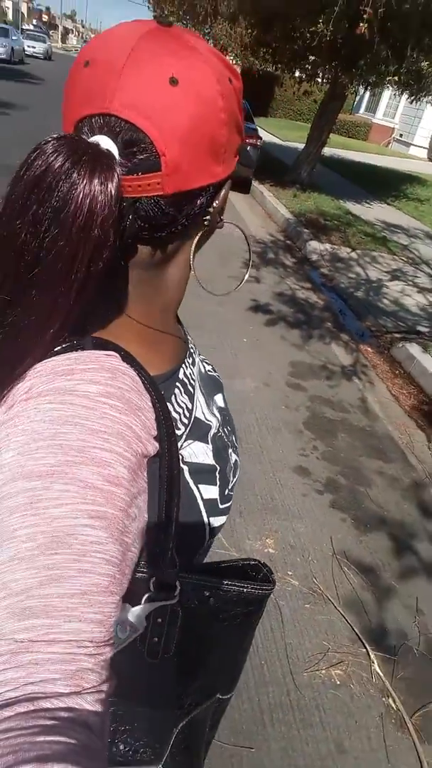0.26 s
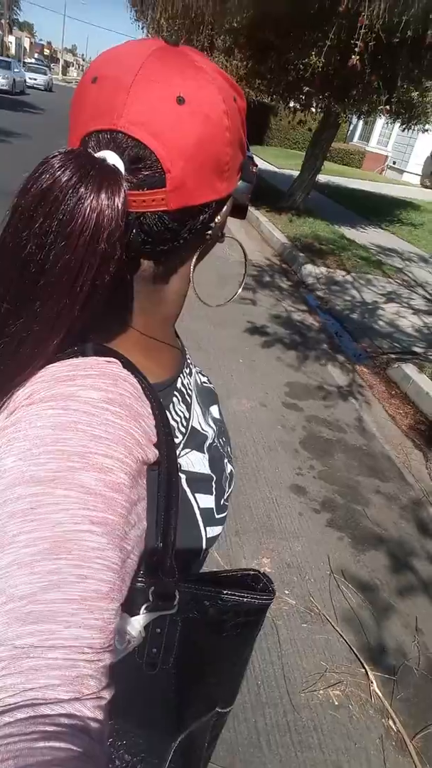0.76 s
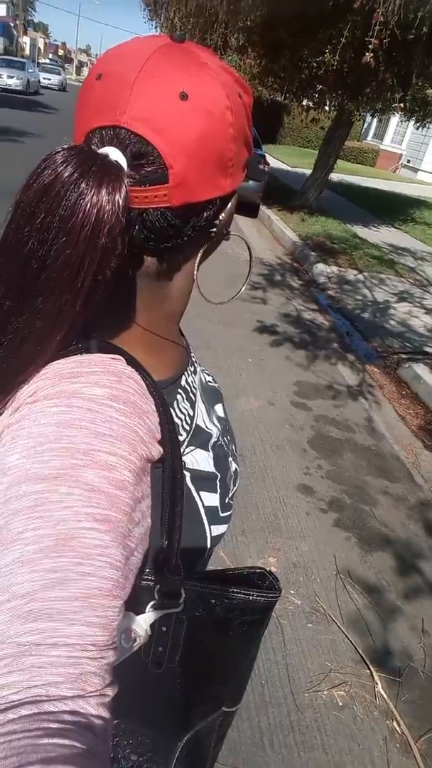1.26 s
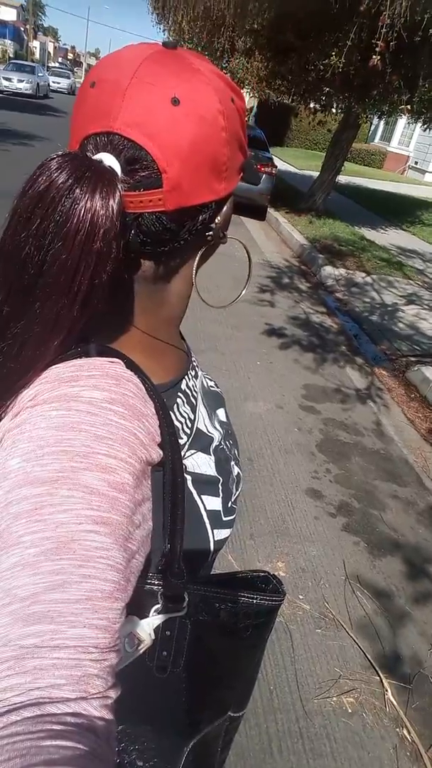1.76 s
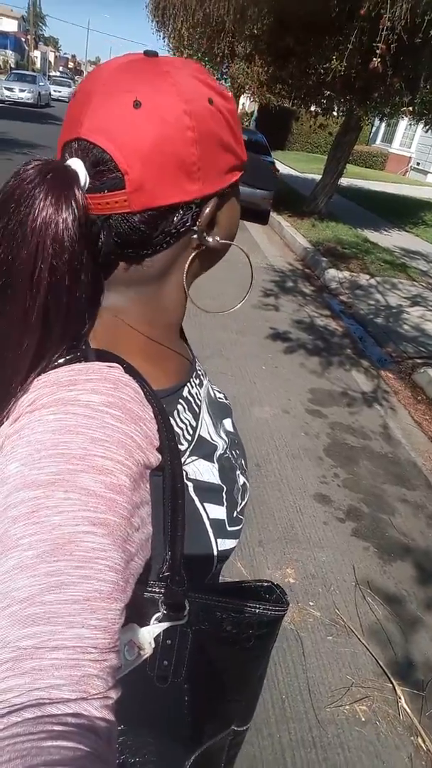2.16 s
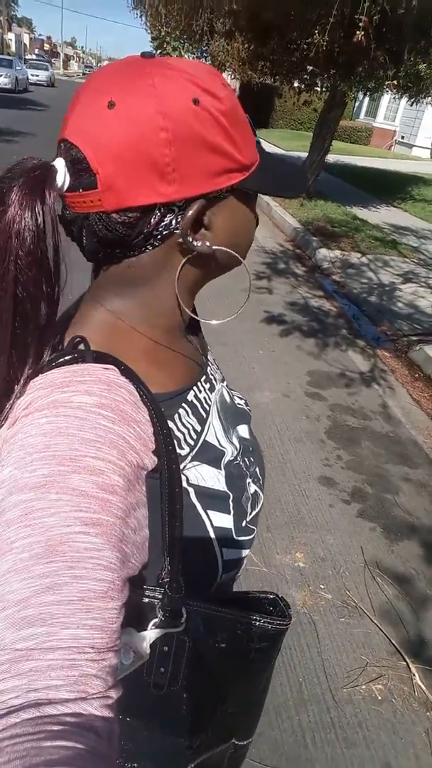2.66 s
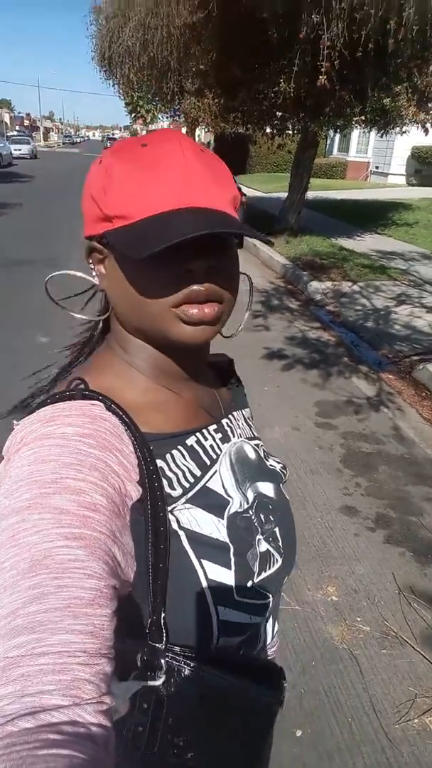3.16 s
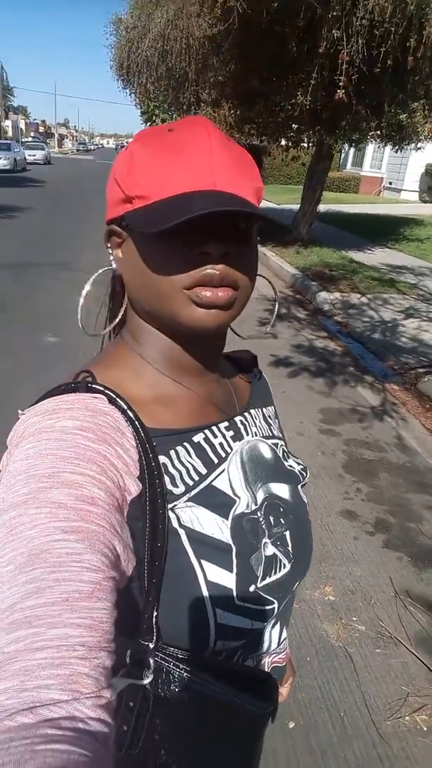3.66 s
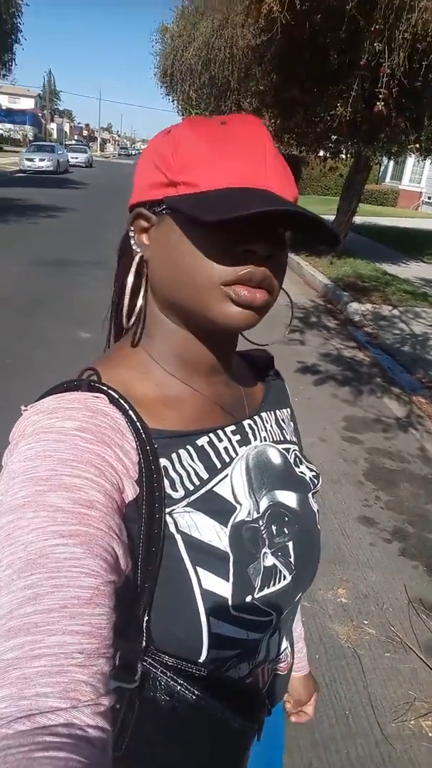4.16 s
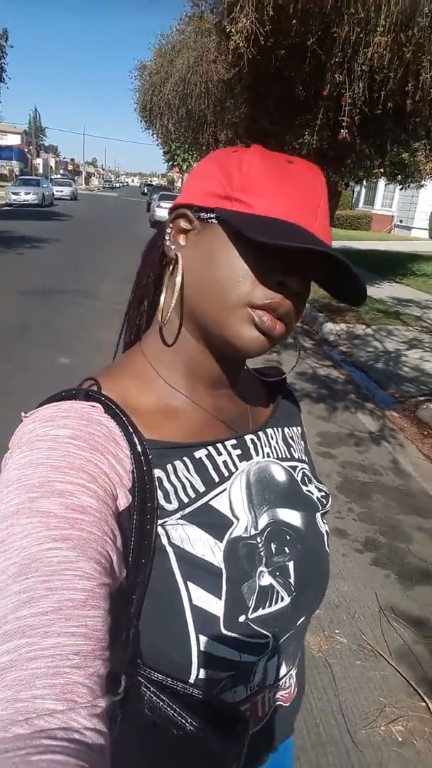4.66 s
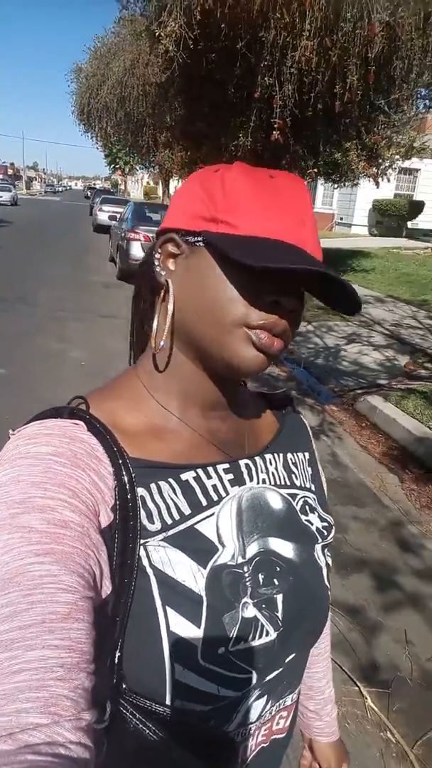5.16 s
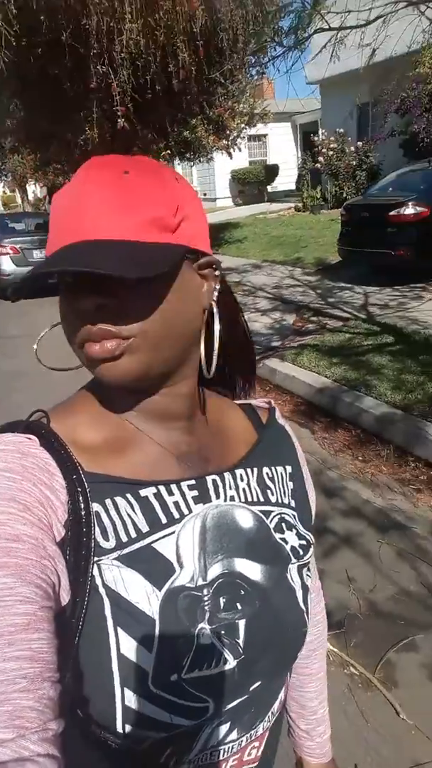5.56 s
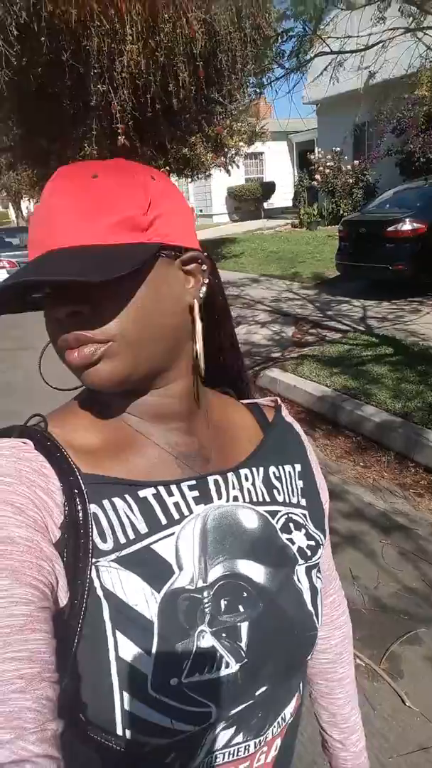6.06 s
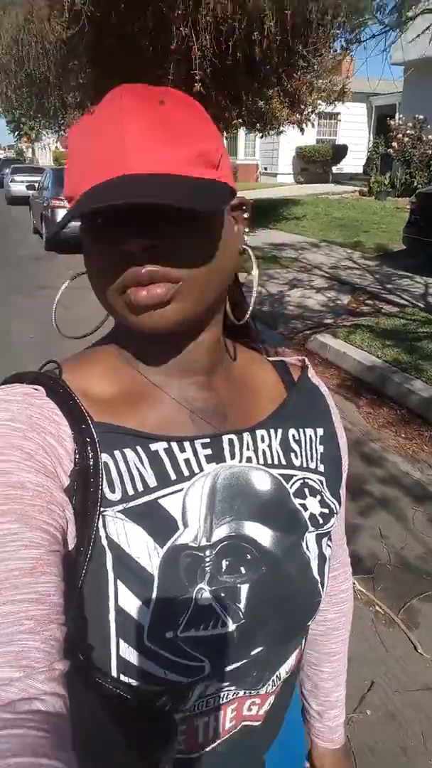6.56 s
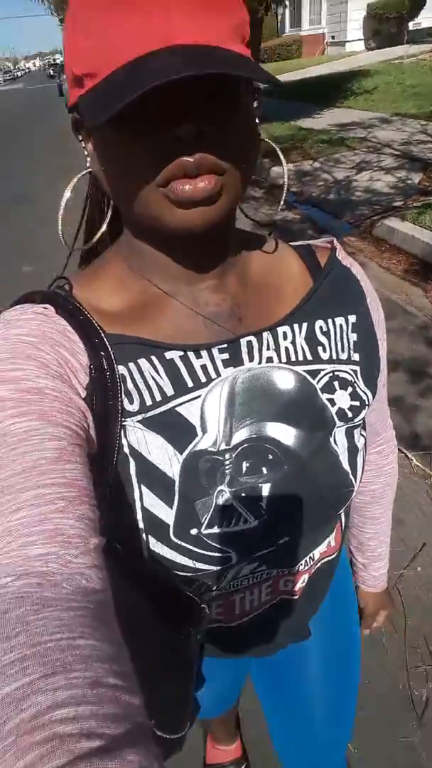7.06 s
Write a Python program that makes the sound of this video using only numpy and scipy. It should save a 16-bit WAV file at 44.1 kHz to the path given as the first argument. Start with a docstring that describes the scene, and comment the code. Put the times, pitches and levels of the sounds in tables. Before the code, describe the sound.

Sparrows chirp over distant traffic and an idling engine on a quiet street; a car door slams, and clothes rustle close by.

```python
"""Quiet residential street, phone at arm's length.

Sparrows chirp in the trees and a farther songbird whistles, over an idling engine, distant traffic
and faint sirens. A car door slams, ringing its skin and cabin, and the houses answer. Close to the
microphone come gritty scuffs from soles and a hand shifting its grip on the phone; clothes and a
shoulder bag rub as the holder turns, and the bag's fittings tick sharply near the end."""
import sys
import numpy as np
from scipy import signal
from scipy.fft import rfft, irfft, next_fast_len
from scipy.io import wavfile
from scipy.ndimage import uniform_filter1d, map_coordinates

SR = 44100
rng = np.random.default_rng(int(sys.argv[2]) if len(sys.argv) > 2 else 0)


def unload_audio(sound):
    """Save the sound as a 16-bit wav file, at the path given as the first command line argument."""
    columns = np.transpose(np.atleast_2d(sound))
    # keep every value between -1 and 1, then stretch to whole-number steps
    steps = np.round(np.clip(columns, -1, 1) * 32767)
    wavfile.write(sys.argv[1], SR, steps.astype(np.int16))


N = 322812

# Diffuse sound at the two ports. Each row: frequency in Hz, left-right likeness (1 is identical).
PORT_LIKENESS = [(200, 0.96), (1200, 0.68), (4000, 0.041)]
# Echo between the houses. Each row: frequency in Hz, t60 in seconds.
STREET_DECAY = [(100, 0.74), (1000, 0.53), (4000, 0.42), (7000, 0.51), (14000, 0.062)]

# Distant roads. Each row of a spectrum, here and below: frequency in Hz, relative density in dB.
RUMBLE_SPECTRUM = [(20, -39), (40, -23), (60, -7), (190, 0.5), (260, -6), (340, -14.5), (900, -45),
                   (2000, -75)]
DRONE_SPECTRUM = [(150, -40), (260, -4.5), (350, 0), (480, -6.5), (900, -45.5)]
TYRE_SPECTRUM = [(150, -7.5), (500, 1.5), (900, -3.5), (1500, -9.5), (2200, -16), (4500, -20), (6000, -34),
                 (15500, -36.5)]
# Far vehicles. Each row: time when nearest and half length in seconds, rumble and drone in relative dB.
PASSES = [(1.102, 0.43, -51, -61), (3.097, 0.35, -53, -64.5), (5.113, 0.45, -50, -57),
          (5.86, 0.12, -66, -49.5), (6.777, 0.38, -54.5, -56.5)]
# The parked engine. Each row: time in seconds, firing rate in Hz, relative level in dB.
ENGINE_IDLE = [(0, 128.1, -45), (3.5, 126.5, -44.5), (5.3, 124.9, -49), (7.3, 123.7, -55)]

# A far siren carries through gaps between the houses.
# Each row: peak time, rise and fall in seconds, relative level in dB.
WAIL_SWELLS = [(.88, 0.22, 0.09, -68.5), (1.62, 1.3, 0.54, -71.5), (4.75, 1, 0.58, -75),
               (6.6, 1.26, 1.9, -77)]
# Snatches of a lower siren.
# Each row: middle and half length in seconds, pitch in Hz, glide in Hz a second, relative level in dB.
LOW_SIREN_GLIDES = [(.3, 0.64, 820.3, 76.5, -63), (5.2, 0.46, 899, -170, -70.5)]

# The songbird. Each row: middle in seconds, pitch in Hz, glide in Hz a second, relative level in dB.
SONGBIRD_WHISTLES = [(.07, 3510, -8000, -67), (.392, 3220, -17000, -62), (.52, 2970, -11000, -67),
                     (.885, 3000, -12000, -64), (.97, 2760, -9000, -74), (1.15, 5000, -500, -73),
                     (2.376, 3590, 12001, -68), (2.449, 2850, 10999.5, -69), (2.49, 4200, -8000, -63),
                     (3.16, 4150, 4999, -67.5)]
# Sparrow syllables, one arch of pitch each. Each row: start, crest and end in seconds into the call,
# half width in seconds, foot and top in Hz, flatness of the top, relative level in dB.
CHIRRUP_SHAPE = [(.002, .034, 0.066, .017, 2557, 4485, 5.08, 1.5),
                 (.050, .078, 0.11, .02, 2716, 4222, 2.57, 2)]
CHEEUP_SHAPE = [(.004, .037, 0.09, .0172, 3045, 4692, 4.6, 1),
                (.086, .107, 0.13, 0.0065, 2520, 3764, 1.73, 3.45)]
CHIP_SHAPE = [(-0.0035, 0.018, 0.062, 0.017, 3200, 3800, 1.67, 1)]
# Calls from the trees. Each row: start in seconds, pitch shift in Hz, relative level in dB.
CHIRRUP_CALLS = [(0.132, 86.5, -45.5), (1.276, -32.5, -45), (2.538, 21, -44.5), (3.928, 20.5, -44),
                 (5.049, -72, -47), (6.946, 30.5, -46.5)]
CHEEUP_CALLS = [(0.669, 88, -48.5), (1.917, -23, -47.5), (3.187, -25.5, -49), (4.44, -39.5, -48),
                (5.626, -61, -46), (6.215, 27.5, -45.5)]
CHIP_CALLS = [(4.801, 171, -53), (5.296, 132, -51), (5.497, 131, -50), (5.853, -18, -49),
              (5.999, -42, -46.5), (6.172, -17, -46), (6.892, -59, -52.5)]
# The sparrows' bearing as the phone swings round. Each row: time in seconds, left port's lead in ms.
SPARROW_BEARING = [(2.6, -.1), (3.3, -0.015), (3.95, -0.077), (5.1, -0.0058), (6.25, 0.077),
                   (6.95, -0.0052)]
# The beak colours the song. Each row: frequency in Hz, gain in dB.
BEAK_RESPONSE = [(2500, -1.5), (4900, 1), (5500, -2), (6500, -5), (9000, -7.5), (10500, 5)]

# Gritty scuffs close by, from soles and a hand shifting its grip on the phone.
# Each row: peak time, rise and fall in seconds, relative level in dB.
CLOSE_SCUFFS = [(1.685, 0.0033, 0.0073, -61), (2.31, 0.02, 0.048, -60.5), (5.83, 0.071, 0.069, -56.5),
                (7.058, 0.034, 0.049, -40)]
GRIT_SPECTRUM = [(300, -2.5), (1480, -6), (1850, 9.5), (2400, -2), (3300, -6), (6000, -26.5)]

# The car door: the rubber seal squeezes; the door catches the latch, hits the frame, shudders and
# settles; the body takes the blow. Each row: start in seconds, relative level in dB, t60 in seconds.
SEAL_SQUEEZE = [(3.6015, -29.5, 0.17)]
DOOR_HITS = [(3.6142, -16, 0.032), (3.6212, -15, 0.019), (3.6265, -19, 0.084), (3.6422, -24, 0.063),
             (3.684, -34, .2)]
BODY_THUD = [(3.621, -20.5, 0.19)]
# Their spectra. Each row: frequency in Hz, relative density in dB.
SEAL_SPECTRUM = [(200, -4), (1800, 7), (2500, -6), (9000, -42.5)]
DOOR_SPECTRUM = [(150, -11.5), (420, 2), (1100, 0.5), (1900, -1), (2350, -12.5), (4200, -13), (5600, -23.5),
                 (7500, -31), (11500, -51), (15000, -73)]
THUD_SPECTRUM = [(30, -24), (60, 7), (290, 8.5), (700, -40)]
# Door skin and cabin air. Each row: frequency in Hz, relative level in dB, t60 in seconds.
SKIN_MODES = [(636, -8, .2), (866, -5, .3), (973, -8, .32), (1058, -6, .27), (1149, 0, .21),
              (1243, -6, .33), (1347, -9, .3), (1484, -6, .24), (1590, 3, .09), (1738, 4, .09),
              (2050, -8, .14)]
CABIN_MODES = [(54, -6, 0.39), (69.3, 2.5, 0.37), (98, 5, 0.19), (124, 9, 0.21), (163.5, -1, 0.43)]
# The phone shades its left port from the door's treble. Each row: frequency in Hz, left over right in dB.
PORT_SHADE = [(700, 2.0), (1200, -2.5), (4000, -4.0), (10000, -2.0)]

# Clothes and bag, close in. Each row: peak time, rise and fall in seconds, relative level in dB.
CLOTH_RUBS = [(4.15, 0.11, 0.068, -65), (4.364, 0.019, 0.034, -54), (4.414, 0.019, 0.0068, -56.5),
              (4.548, 0.11, 0.045, -58.5), (6.771, 0.08, 0.36, -67), (7.052, 0.046, 0.061, -39),
              (7.215, 0.068, 0.059, -50)]
CLOTH_SPECTRUM = [(200, -8), (600, -3), (1400, 0), (1800, 5), (2200, 5.5), (2700, 1.5), (3700, 7.5),
                  (5200, -3), (7000, -9), (8100, -14), (9300, -6.5), (12500, -40)]
# The bag's fittings. Each row: start in seconds, relative level in dB.
BAG_TICKS = [(4.5255, -39.5), (7.0125, -35.5), (7.0403, -30), (7.1236, -21), (7.1935, -43), (7.2083, -39),
             (7.222, -37), (7.2288, -37)]
TICK_SPECTRUM = [(200, 1.5), (900, -0.5), (3500, 5), (5200, 2), (7000, 3.5), (10000, -8), (16000, -20)]

SIDES = np.array([[.5], [-.5]])  # splits a difference between the left and right ports


def amp(db):
    return 10 ** (np.asarray(db) / 20)


def unit(x):
    return x / np.sqrt(np.mean(x ** 2) + 1e-20)


def clock():
    return np.arange(N) / SR


def along(points, hz):
    """(Hz, value) points read on a log axis."""
    f, v = np.transpose(points)
    return np.interp(np.log(hz + 1), np.log(f + 1), v)


def curves(rows, t):
    """Each column after the time, read at times t."""
    s, *cols = np.transpose(rows)
    return [np.interp(t, s, c) for c in cols]


def wobble(rate):
    """A smooth random curve, rate knots a second."""
    knots = rng.standard_normal(int(N * rate / SR) + 4)
    return map_coordinates(knots, [clock() * rate])


def swell(t, s, rise, fall, db):
    """Gain of a smooth rise to db at time s and the fall after it."""
    return amp(db - 12.6 * ((t - s) / np.where(t < s, rise, fall)) ** 2)


def add(track, s, sound):
    """Mix a sound in from time s."""
    part = track[..., max(round(s * SR), 0):][..., :sound.shape[-1]]
    part += sound[..., :part.shape[-1]]


def filtered(x, response):
    """x times a complex response of frequency."""
    size = next_fast_len(N + SR // 2)
    return irfft(rfft(x, size) * response(np.fft.rfftfreq(size, 1 / SR)), size)[..., :N]


def coloured(x, spectrum, size=4096):
    """x through a minimum-phase filter of energy 1."""
    cepstrum = irfft(np.log(amp(along(spectrum, np.fft.rfftfreq(size, 1 / SR)))))
    cepstrum[1:size // 2] *= 2
    cepstrum[size // 2 + 1:] = 0
    pulse = irfft(np.exp(rfft(cepstrum)))
    return signal.fftconvolve(x, pulse / np.linalg.norm(pulse))[:N]


def placed(x, lead_ms, left_db):
    """One source at two microphone ports; the left is lead_ms earlier and left_db louder."""
    return amp(SIDES * left_db) * filtered(x, lambda hz: np.exp(2j * np.pi * hz * SIDES * lead_ms / 1000))


def diffuse(noises):
    """Two unrelated noises become a diffuse field: alike in the bass, apart in the treble."""
    angle = lambda hz: np.arccos(along(PORT_LIKENESS, hz)) / 2
    mid, side = filtered(noises, lambda hz: np.array([np.cos(angle(hz)), np.sin(angle(hz))]))
    return np.array([mid + side, mid - side])


def rush(spectrum):
    """Diffuse stereo noise of rms 1."""
    noise = diffuse(rng.standard_normal((2, N)))
    return unit(filtered(noise, lambda hz: amp(along(spectrum, hz))))


def road_level(steady_db, pass_db):
    """Steady wash plus each passing vehicle, whose power falls with the square of its distance."""
    t = clock()
    passing = sum(amp(db) ** 2 / (1 + ((t - s) / half) ** 2) for (s, half, *_), db in zip(PASSES, pass_db))
    return np.sqrt(amp(steady_db) ** 2 + passing)


def traffic():
    """Rumble, drone and tyre wash from distant roads."""
    _, _, rumble_db, drone_db = np.transpose(PASSES)
    rumble = road_level(-53.5, rumble_db) * amp(-0.5 + 1.6 * wobble(7.1)) * rush(RUMBLE_SPECTRUM)
    drone = road_level(-80.5, drone_db) * amp(-0.5) * rush(DRONE_SPECTRUM)
    tyres = amp(-59.5 + 0.16 * wobble(14)) * rush(TYRE_SPECTRUM)
    return placed(rumble + drone + tyres, lead_ms=-0.1, left_db=0.7)


def engine():
    """A parked engine drones on its firing note."""
    hz, db = curves(ENGINE_IDLE, clock())
    phase = 2 * np.pi * np.cumsum(hz * (1 + 0.00513 * wobble(12))) / SR
    drone = amp(db + 0.5 + 0.75 * wobble(12)) * (np.sin(phase) + amp(-17) * np.sin(2 * phase))
    return placed(drone, lead_ms=-0.06, left_db=0.56)


def street_echo(x, build_s):
    """Scatter from houses, cars and trees; each frequency dies at its own speed."""
    hz, t, frames = signal.stft(rng.standard_normal((2, SR)), SR, nperseg=256)
    decay = amp(-60 * t / along(STREET_DECAY, hz)[:, None])
    _, tail = signal.istft(frames * decay, SR, nperseg=256)
    onset = 1 - np.exp(-np.arange(tail.shape[1]) / SR / build_s)
    tail = diffuse(tail * onset)[:, :SR]
    return signal.fftconvolve(x[None], tail / np.linalg.norm(tail[0]), axes=1)[:, :N]


def glides(rows, waver_hz):
    """Tones that swell and fade while their wavering pitch slides."""
    t, waver = clock(), waver_hz * wobble(130)
    out = np.zeros(N)
    for s, half, hz, slope, db in rows:
        phase = 2 * np.pi * np.cumsum(hz + slope * (t - s) + waver) / SR
        out += swell(t, s, half, half, db) * np.sin(phase)
    return out


def sirens():
    """A far siren winds up and coasts down over a lower one; both arrive mostly as a smear of echoes."""
    first_crest_s, period_s, wind_up_s, coast_s = .3, 5.24, 1.3, 1.82
    top_hz, rest_hz, smear_hz = 1750, 595.4, 34
    t = clock()
    since_crest = (t - first_crest_s) % period_s
    climb = np.clip((since_crest - period_s) / wind_up_s + 1, 0, 1)
    coast = np.exp(-since_crest / coast_s)
    hz = rest_hz + (top_hz - rest_hz) * (coast + (1 - coast) * np.sin(np.pi / 2 * climb))
    phase = 2 * np.pi * np.cumsum(hz + smear_hz * wobble(130)) / SR
    level = sum(swell(t, *row) for row in WAIL_SWELLS)
    wails = level * np.sin(phase) + glides(LOW_SIREN_GLIDES, smear_hz)
    return amp(2) * wails + amp(4) * street_echo(wails, build_s=0.0072)


def foliage(sound, near_db, far_db):
    """The sound, its quick scatter off nearby leaves and a long street tail, different at each port."""
    t = np.arange(SR // 2) / SR
    paths = np.zeros((2, len(t)))
    for db, t60 in ((near_db, .035), (far_db, .65)):
        tail = rng.standard_normal(paths.shape) * amp(-60 * t / t60)
        paths += amp(db) * tail / np.linalg.norm(tail[0])
    paths[:, 0] = 1  # the direct path
    return signal.fftconvolve(np.atleast_2d(sound), paths, axes=1)


def songbird(half_length_s=0.036):
    """A bird beyond the sparrows slurs short whistles, half lost in its echoes."""
    whistles = glides([(s, half_length_s, *rest) for s, *rest in SONGBIRD_WHISTLES], waver_hz=110)
    return amp(-4) * foliage(whistles, near_db=-0.5, far_db=5)[:, :N]


def syllables(shape, t, fall_stretch=1.1, start_db=-24, end_db=-15):
    """Pitch and level of a call: each syllable arches up and back, swells in and holds almost to its end."""
    start, crest, end, width, foot_hz, top_hz, flatness, db = np.transpose(shape)[..., None]
    rising = t < crest
    from_crest = np.abs((t - crest) / np.where(rising, width, fall_stretch * width))
    pitch = foot_hz + (top_hz - foot_hz) / (1 + from_crest ** flatness)
    edge = ((t - crest) / np.where(rising, crest - start, end - crest)) ** 2
    level_db = db + np.where(rising, start_db * edge, end_db * edge ** 2)
    return np.choose(level_db.argmax(axis=0), pitch), level_db.max(axis=0)


def syrinx(shape, calls, beat_hz, upper_db, lower_db, rough, rasp_db, octave_db, lead_ms=0):
    """A gliding whistle; on high notes the syrinx's other side beats against it and throws sidebands."""
    catch_s = .025  # the hoarse onset starts this long before the note
    out = np.zeros((2, N))
    t = np.arange(int((catch_s + shape[-1][2] + .008) * SR)) / SR - catch_s
    pitch, level_db = syllables(shape, t)
    pitch = uniform_filter1d(pitch, size=90)
    strain = (pitch / pitch.max()) ** 2
    for s, shift_hz, db in calls:
        noise = rng.standard_normal((3, len(t)))
        pitch_jitter, beat_jitter, rasp = unit(uniform_filter1d(uniform_filter1d(noise, 30), 30))
        phase = 2 * np.pi * np.cumsum((pitch + shift_hz) * (1 + rough * strain * pitch_jitter)) / SR
        lead_s = (curves(SPARROW_BEARING, s)[0] + lead_ms) / 1000
        phase = phase + 2 * np.pi * pitch * lead_s * SIDES
        beat = 2 * np.pi * np.cumsum(beat_hz * (1 + 0.081 * beat_jitter)) / SR
        upper = amp(upper_db) * (np.sin(phase + beat) + amp(-19) * np.sin(phase + 2 * beat))
        voice = np.sin(phase) + strain * (upper + amp(lower_db) * np.sin(phase - beat))
        # the octave is hoarse, and strongest while the note is still catching
        hoarse = amp(rasp_db) * np.exp(-((t - .005) / 0.013) ** 2) + amp(level_db + octave_db)
        call = amp(db) * (amp(level_db) * voice + hoarse * rasp * np.sin(2 * phase))
        call = foliage(call * signal.windows.tukey(len(t), .1), near_db=-4, far_db=-6)
        add(out, s - catch_s, call)
        # a house front throws the call back, left and right swapped
        wall_delay_s = .035 + .012 * rng.uniform(-1, 1)
        add(out, s - catch_s + wall_delay_s, amp(-16) * call[::-1])
    return out


def sparrows():
    """Up in the trees one bird alternates two long calls; a second cuts in with short chips."""
    chirrups = syrinx(CHIRRUP_SHAPE, CHIRRUP_CALLS, beat_hz=452, upper_db=-10, lower_db=-6.5,
                      rough=0.027, rasp_db=-13.5, octave_db=-26)
    cheeups = syrinx(CHEEUP_SHAPE, CHEEUP_CALLS, beat_hz=422, upper_db=-6, lower_db=-7,
                     rough=0.021, rasp_db=-15, octave_db=-25)
    chips = syrinx(CHIP_SHAPE, CHIP_CALLS, beat_hz=655, upper_db=-2, lower_db=-20,
                   rough=0.027, rasp_db=-23, octave_db=-21, lead_ms=-0.053)
    return amp(-0.5) * filtered(chirrups + cheeups + chips, lambda hz: amp(along(BEAK_RESPONSE, hz)))


def rubbing(strokes, spectrum, spiky_db=5.5):
    """Close to the microphone, surfaces slip in tiny grains under each stroke."""
    def grains():
        return unit(coloured(rng.standard_normal(N) * amp(spiky_db * wobble(600)), spectrum))

    level = sum(swell(clock(), *row) for row in strokes)
    direct = placed(grains(), lead_ms=-0.29, left_db=-3)
    spread = amp(-2.5) * np.array([grains(), grains()])
    return level * (direct + spread)


def bursts(rows, spectrum):
    """A dying puff of coloured noise for each (start, dB, t60) row."""
    out, t = np.zeros(N), np.arange(SR // 4) / SR
    for s, db, t60 in rows:
        add(out, s, amp(db - 60 * t / t60) * rng.standard_normal(len(t)))
    return coloured(out, spectrum)


def ring(modes, attack_s):
    """Damped modes, each struck a little differently."""
    t = np.arange(SR // 2) / SR
    tones = sum(amp(db + rng.normal() - 60 * t / t60) * np.sin(2 * np.pi * (hz * t + rng.random()))
                for hz, db, t60 in modes)
    return tones * (1 - np.exp(-t / attack_s))


def car_door():
    """The seal squeezes, the latch clatters; the blow rings the skin, thuds the body, pumps the cabin air."""
    door = bursts(SEAL_SQUEEZE, SEAL_SPECTRUM) + bursts(DOOR_HITS, DOOR_SPECTRUM)
    door += bursts(BODY_THUD, THUD_SPECTRUM)
    add(door, 3.6195, amp(-27.5) * ring(SKIN_MODES, attack_s=0.001))
    add(door, 3.619, amp(-30) * ring(CABIN_MODES, attack_s=0.019))
    direct = placed(door, lead_ms=0.1, left_db=-1)
    shaded = filtered(direct, lambda hz: amp(SIDES * along(PORT_SHADE, hz)))
    return shaded + amp(-14.5) * street_echo(door, build_s=0.0067)


def bag_ticks(t60=0.0033):
    """Small hard parts of the bag snap against each other, close by on the right."""
    snaps = bursts([(s, db, t60) for s, db in BAG_TICKS], TICK_SPECTRUM)
    return placed(snaps, lead_ms=0, left_db=-9)


def scene():
    """The street and, at arm's length, the person holding the phone."""
    holder = rubbing(CLOTH_RUBS, CLOTH_SPECTRUM) + rubbing(CLOSE_SCUFFS, GRIT_SPECTRUM) + bag_ticks()
    return traffic() + engine() + sirens() + sparrows() + songbird() + car_door() + holder


def record(dry):
    """The phone keeps nothing above its band limit."""
    return filtered(dry, lambda hz: hz < 15750)


dry = scene()
out = record(dry)
unload_audio(out)
```